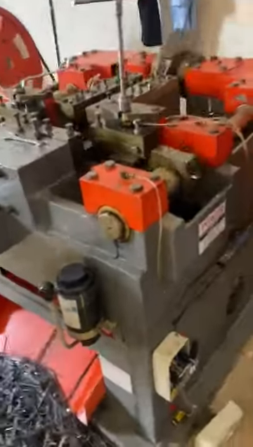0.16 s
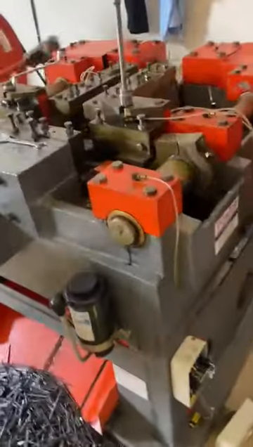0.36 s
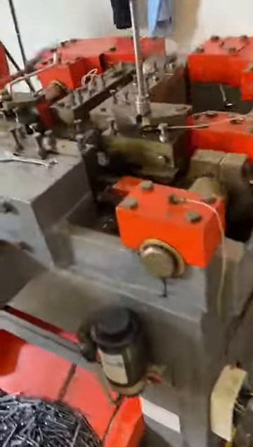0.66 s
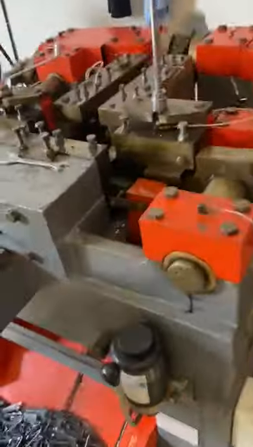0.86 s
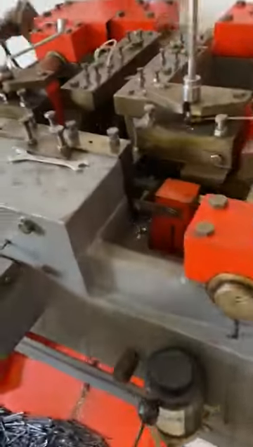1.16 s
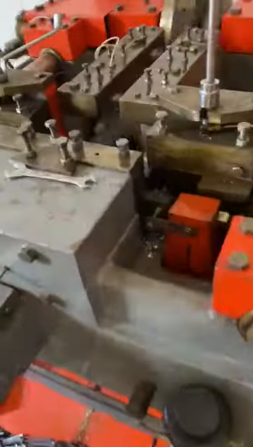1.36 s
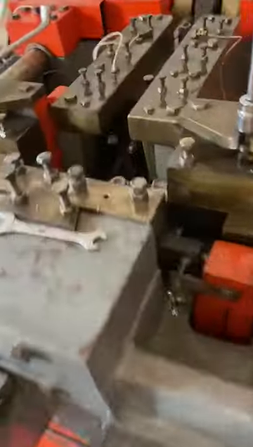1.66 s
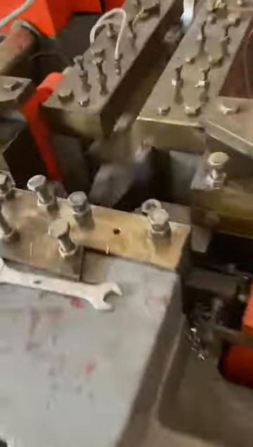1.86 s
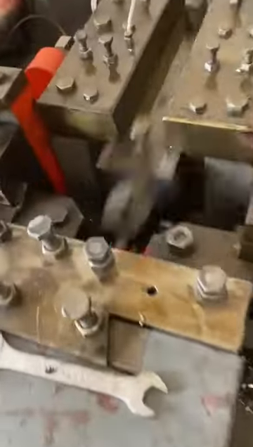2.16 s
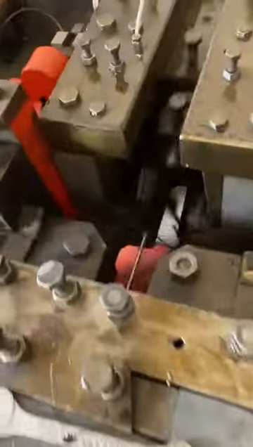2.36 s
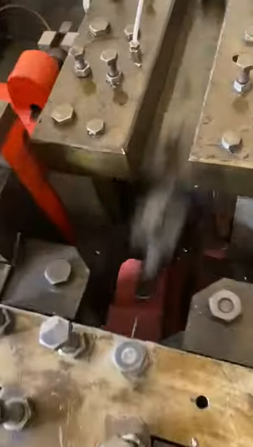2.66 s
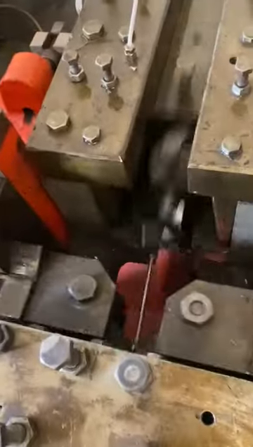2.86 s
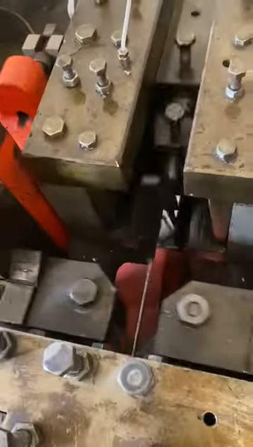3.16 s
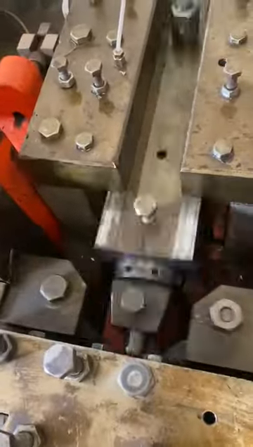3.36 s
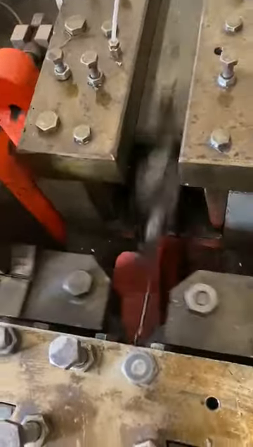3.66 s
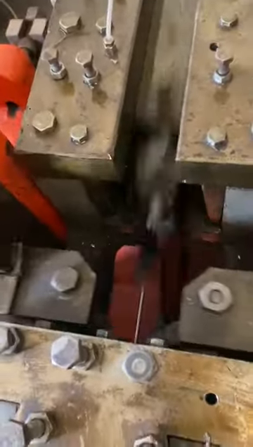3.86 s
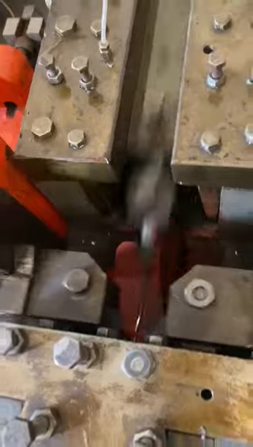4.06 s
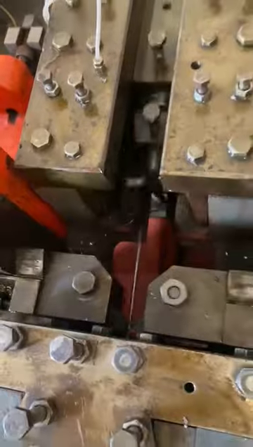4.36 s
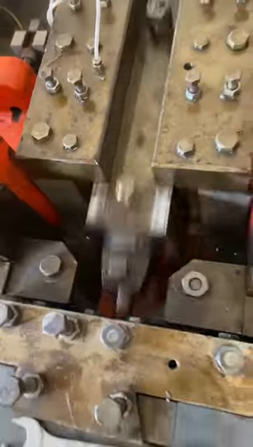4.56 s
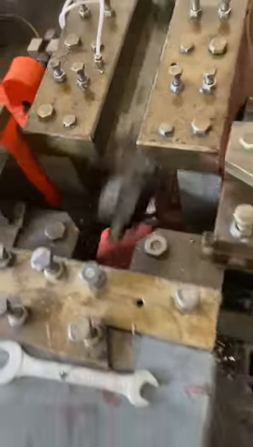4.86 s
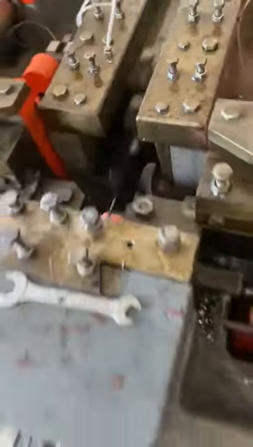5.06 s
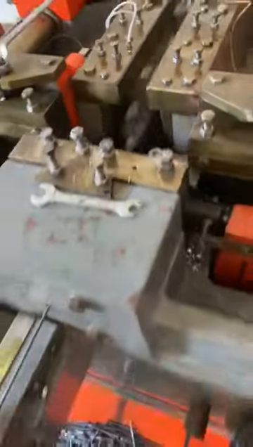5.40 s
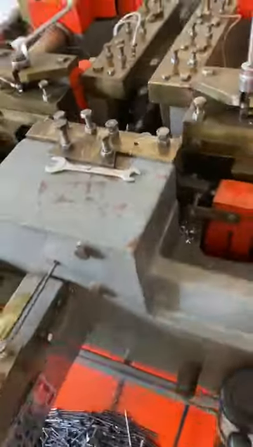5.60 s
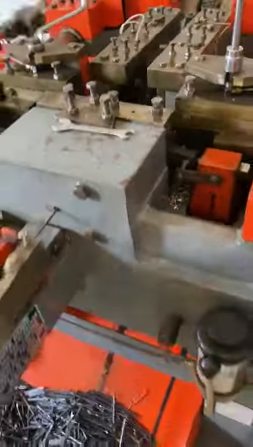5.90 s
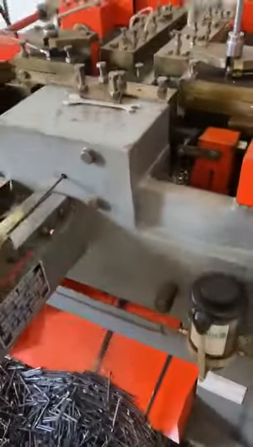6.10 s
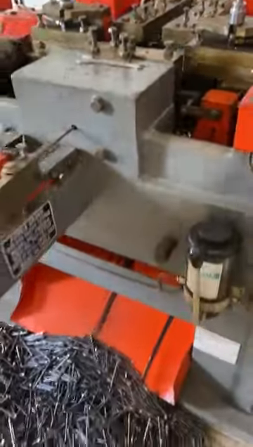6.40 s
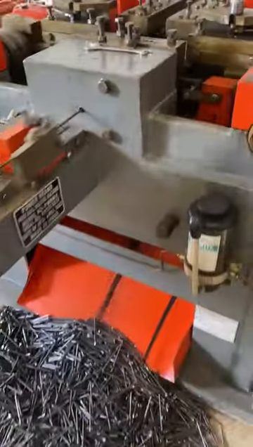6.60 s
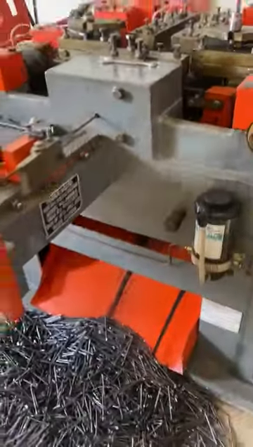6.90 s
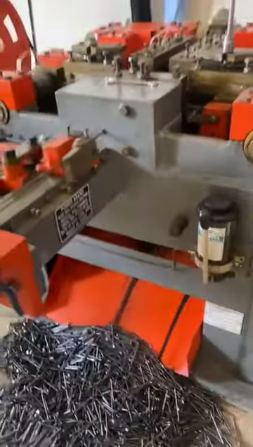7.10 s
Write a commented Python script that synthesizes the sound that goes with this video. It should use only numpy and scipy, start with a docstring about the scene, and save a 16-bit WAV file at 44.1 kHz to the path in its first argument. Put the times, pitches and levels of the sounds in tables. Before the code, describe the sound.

From 0 to 7.2 seconds a wire nail machine hammers without pause, one cycle about every 0.39 seconds. Each cycle begins with a bright cutter snap, then a gripper knock and a bass-heavy ram thud with slack rebounds; about 0.2 seconds after the snap the punch slams, dominant and short, ringing the cast frame, with a small high tick just after. Slams land near 0.3, 0.7, 1.1, 1.5 seconds and onward. Nails ping and finely jingle on a steel chute, with a prominent ping near 2.5. Air puffs fade at about 0.5, 0.8, 1.6 and 2.0, then more faintly from 4.7 onward. The sound is closest and brightest around 2 to 3 seconds; after 5.5 treble recedes, and from 6 cutters and slams weaken. A low motor drone with wavering hum sits beneath, with a faint, short workshop tail and wide stereo treble.

```python
"""A wire nail machine turns over about two and a half times a second, close to a moving stereo microphone.
Each turn the punch slams the head, the cutters snap, the grippers knock and the ram thuds home:
noise shaped in bands, with ringing modes of frame and chute. Nails ping and jingle as modes of the steel
chute, an air valve puffs fading noise, and the drone is patchy noise with two wavering low hum lines,
the upper near a mode of the cast frame. A workshop answers all but the drone with a faint diffuse tail."""
import sys
import numpy as np
from scipy import signal
from scipy.fft import rfft, irfft
from scipy.io import wavfile
from scipy.ndimage import uniform_filter1d

SR = 44100
rng = np.random.default_rng(int(sys.argv[2]) if len(sys.argv) > 2 else 0)


def persist_wave(psi):
    """Save psi, clipped to +-1, as 16-bit WAV."""
    counts = np.round(np.clip(psi, -1, 1) * 32767).astype(np.int16)
    wavfile.write(sys.argv[1], SR, np.atleast_2d(counts).T)


N = 319284  # length in samples

# Turns of the crank. Each row: punch time in seconds, punch level in dB, ram level in dB, cutter level in dB.
TURNS = [(-0.075, -21, -10, -23), (0.314, -1.5, -8, -22), (0.705, 0.5, -10, -27.5), (1.091, 1, -7, -32),
         (1.48, 3.5, -6, -19.5), (1.867, 2, -5.5, -20.5), (2.254, -1.5, -7, -18.5), (2.643, 0, -5, -20),
         (3.033, -1, -8.5, -20), (3.421, -1.5, -7.5, -22.5), (3.811, 0, -8, -21), (4.2, -0.5, -8, -21),
         (4.59, 1.5, -8, -19), (4.979, 2.5, -8.5, -25), (5.372, -1, -10.5, -22), (5.761, 0.5, -11, -24),
         (6.15, -2, -11, -34), (6.539, -4, -13, -35.5), (6.931, -7, -13.5, -31.5), (7.32, -7, -14.5, -31)]
# Ringing modes of the steel chute. Each row: frequency in Hz, relative level in dB, t60 in seconds.
CHUTE_MODES = [(2918, -8.5, 0.25), (3643, -4, 0.19), (3990, -9.5, 0.31), (4462, -4, 0.23), (5500, 0, 0.079),
               (6302, -2, 0.23), (7890, -16, 0.2), (8300, -10.5, 0.075), (10670, -28.5, 0.047),
               (11100, -31.5, 0.063)]
# How far the side resembles the mid; above 0 leans left. Each row: frequency in Hz, likeness from -1 to 1.
SIDE_LEAN = [(150, 0), (330, .5), (550, .64), (1000, .5), (1600, .2), (2300, -.15), (6000, 0)]
CUT_S = -0.2  # the cutters snap this long before the punch


def gain_of(db):
    """Decibels as an amplitude factor."""
    return 10 ** (np.asarray(db) / 20)


def evened(x):
    """Scale to an RMS of one."""
    return x / np.sqrt(np.mean(x ** 2) + 1e-20)


def read(points, hz, column=1):
    """Read a table on a log-frequency axis."""
    points = np.asarray(points, float)
    return np.interp(np.log(hz + 1), np.log(points[:, 0] + 1), points[:, column])


def over_time(points):
    """Gain curve over the whole scene from times in seconds and levels in dB."""
    s, db = np.transpose(points)
    return gain_of(np.interp(np.arange(N) / SR, s, db))


def add(mix, s, sound):
    """Lay a sound into the mix at s seconds, cutting what falls outside."""
    at = round(s * SR)
    sound = sound[:, max(-at, 0):]
    part = mix[:, max(at, 0):][:, :sound.shape[1]]
    part += sound[:, :part.shape[1]]


def near_db(s):
    """Nearness of the microphone, which drifts over the tools and away."""
    # Each row: time in seconds, nearness in dB.
    nearness = [(0, -3), (0.9, -3), (1.9, 0), (2.6, 2), (3.6, -2), (4.8, -2), (5.6, -5.5), (6.3, -12),
                (7.24, -5)]
    return np.interp(s, *np.transpose(nearness))


def side_likeness(hz):
    """Signed share of the mid signal in the side signal."""
    return np.clip(read(SIDE_LEAN, hz), -1, 1)


def rung(modes, t, spread_db, stray):
    """Every mode is a close pair with its own strength, phase and slight detuning, on both paths."""
    hz, db, t60 = np.transpose(modes + modes)[:, :, None, None]
    strength, phase, off = rng.standard_normal((3, len(hz), 2, 1))
    angle = 2 * np.pi * hz * (1 + stray * off) * t + 3 * phase
    decay = gain_of(db + spread_db * strength - 60 * t / t60)
    return (decay * np.sin(angle)).sum(0)


def blows(rows, tone, long, soft, alike, modes=(), modes_db=0, rebounds=(),
          rough_db=2.5, ripple_db=3, size=8192):
    """Dense vibration of struck steel: bass swells late and lasts, treble is at once; like blows sound alike.

    Each row: start in seconds, level in dB, bass tilt in dB, treble tilt in dB."""
    # How a blow swells and dies, before soft scales the rise and long the t60.
    # Each row: frequency in Hz, rise time constant in seconds, t60 in seconds.
    swell = [(100, 0.011, 0.19), (296, 0.0045, 0.15), (845, 0.0023, 0.066), (2610, 0.00065, 0.16),
             (8400, 0.0012, 0.058)]
    out, t, hz = np.zeros((2, N)), np.arange(size) / SR, np.fft.rfftfreq(size, 1 / SR)

    # overlapping bands that sum to one
    centres = np.geomspace(90, 11000, 8)
    bands = np.array([np.interp(np.log(hz + 1), np.log(centres), one) for one in np.eye(len(centres))])
    rise = read(swell, centres)[:, None] * soft
    t60 = read(swell, centres, column=2)[:, None] * long
    stroke = (1 - np.exp(-t / rise)) ** 2 * gain_of(-60 * t / t60)
    shape = stroke
    for late, db in rebounds:  # slack in the linkage strikes again
        shape = shape + gain_of(db) * np.roll(stroke, round(late * SR), 1) * (t > late)

    keep = np.clip(alike, 0, 1)
    noise, partials = rng.standard_normal((2, size)), rng.standard_normal(len(hz))
    for s, db, bass_db, treble_db in rows:
        # part of the previous blow's noise and partials carries on into this one
        noise = keep * noise + np.sqrt(1 - keep ** 2) * rng.standard_normal((2, size))
        partials = keep ** 2 * partials + np.sqrt(1 - keep ** 4) * rng.standard_normal(len(hz))
        looseness = evened(uniform_filter1d(rng.standard_normal(size), size=110))
        chatter = evened(gain_of(rough_db * looseness))  # loose parts
        ripple = evened(gain_of(ripple_db * evened(uniform_filter1d(partials, size=12))))  # short partials
        tilt_db = read([(250, bass_db), (900, 0), (4000, treble_db)], hz)
        colour = evened(gain_of(read(tone, hz))) * gain_of(tilt_db) * ripple
        banded = irfft(rfft(noise * chatter)[:, None] * colour * bands, size)
        body = (banded * shape).sum(1)
        add(out, s - .002, gain_of(db) * body)
        if modes:
            ring_t = t[:6000]
            fade = (1 - np.exp(-ring_t / 0.0074)) * np.cos(np.linspace(0, np.pi / 2, 6000))
            ringing = rung(modes, ring_t, spread_db=2.5, stray=0.0098) * fade
            add(out, s, gain_of(db + modes_db) * ringing)
    return out


def untilted(s, db):
    """Rows for blows() with neither bass nor treble tilt."""
    return [(at, level, 0, 0) for at, level in zip(s, db)]


def drone(wide_db=-5):
    """Motor, gears, belts and bearings as patchy noise with two wavering low hum lines, in mid and side."""
    # Level over time. Each row: time in seconds, level in dB.
    drone_levels = [(0, -26), (1, -28), (2, -26.5), (3, -29.5), (4, -29.5), (5, -29), (6, -30), (7.24, -30)]
    # Mid colour. Each row: frequency in Hz, relative level in dB per Hz.
    mid_tone = [(15, -55), (25, -21), (125, 7), (410, 13), (4450, -14.5), (4930, -84), (6390, -18),
                (7090, -63), (8500, -67), (12200, -101), (15900, -131), (22000, -120)]
    # Side colour. Each row: frequency in Hz, relative level in dB per Hz.
    side_tone = [(100, -85), (230, -30.5), (400, -12.5), (900, -12.5), (2500, -21), (5900, -37),
                 (8500, -31), (11000, -31), (12200, -56)]
    # Low hum lines, the upper near a mode of the cast frame.
    # Each row: centre frequency in Hz, RMS level in dB.
    hum_lines = [(135, -45), (162, -46)]
    frames, hz = N // 256 + 5, np.fft.rfftfreq(1024, 1 / SR)
    a, b, c, d, patches = rng.standard_normal((frames, 513, 5)).T
    patches = evened(uniform_filter1d(uniform_filter1d(patches, 8, 0), 10, 1))  # over frequency, then time
    lean, mid = side_likeness(hz)[:, None], a + 1j * b
    z = np.array([mid, lean * mid + np.sqrt(1 - lean ** 2) * (c + 1j * d)])
    tone_db = np.array([read(mid_tone, hz), read(side_tone, hz)])[:, :, None]
    z *= gain_of(tone_db + 1.8 * patches)
    mid, side = signal.istft(z, nperseg=1024, noverlap=768)[1][:, :N]
    level = over_time(drone_levels)
    mid, side = level * evened(mid), level * gain_of(wide_db) * evened(side)
    for line_hz, db in hum_lines:
        waver = evened(uniform_filter1d(uniform_filter1d(rng.standard_normal(N), 3000), 3000))
        phase = 2 * np.pi * np.cumsum(line_hz + 1.25 * waver) / SR
        mid += np.sqrt(2) * gain_of(db) * np.sin(phase)
    return mid, side


def punch():
    """The punch slams the nail head and rings the cast frame; bass stays level, treble follows nearness."""
    # Each row: frequency in Hz, relative level in dB per Hz.
    punch_tone = [(35, -25), (60, -3), (464, 10), (905, -3.5), (1160, -7), (1510, -8.5), (2750, -23),
                  (5250, -30), (10900, -48), (12200, -111), (15900, -93), (22000, -120)]
    # Modes of the cast frame. Each row: frequency in Hz, relative level in dB, t60 in seconds.
    frame_modes = [(163, -18.5, 0.61), (250, -22.5, 0.26), (332.2, -22, 0.22), (384, -32, 0.17),
                   (479.3, -16, 0.041), (877, -11, 0.18), (1430, -64, 0.15)]
    bass_level_db, treble_level_db, treble_per_near = -10, 6, 0.79
    s, punch_db = np.transpose(TURNS)[:2]
    treble_db = treble_level_db + treble_per_near * near_db(s)
    heads = zip(s, punch_db, bass_level_db - punch_db, treble_db - punch_db)
    return blows(heads, punch_tone, long=1.0, soft=0.94, alike=0.895, modes=frame_modes, modes_db=-12.5,
                 rebounds=[(.028, -17), (.05, -21), (.095, -29)])  # (seconds late, dB)


def ticks():
    """A small bright tick after each punch, its level following the nearness of the microphone."""
    # Each row: frequency in Hz, relative level in dB per Hz.
    tick_tone = [(1500, -53), (4000, 30), (6500, 58), (12000, -70)]
    tick_s, tick_db = 0.061, -33.5  # after the punch; level at zero nearness
    s = np.transpose(TURNS)[0]
    return blows(untilted(s + tick_s, tick_db + near_db(s)), tick_tone, long=1.0, soft=0.9, alike=0.61)


def nails(per_s=500, spread_db=4):
    """Cut nails ping on the chute; a fine random jingle follows each cut, each touch ringing one mode."""
    # Jingle before its decay after each cut. Each row: time in seconds, level in dB.
    jingle_levels = [(0, -49), (1.2, -46.5), (2.4, -48), (3.6, -48.5), (4.8, -46), (6, -51), (7.24, -46.5)]
    # Nails that bounce again. Each row: start in seconds, nominal peak in dB at the strongest mode.
    bounces = [(0.5681, -34.5), (0.768, -37), (0.857, -35), (1.032, -40), (1.3518, -35), (1.7449, -31.5),
               (2.2104, -38.5), (2.5174, -27.5), (3.3635, -37), (4.142, -34), (4.859, -37), (6.336, -41),
               (6.717, -39)]
    ping_s = -0.197  # against the punch
    ping_db, ping_spread_db = -9.5, 3  # against the cutters
    out, t = np.zeros((2, N)), np.arange(N) / SR
    punch_s, cut_db = np.transpose(TURNS)[[0, 3]]

    dropped = ping_db + cut_db + ping_spread_db * rng.standard_normal(len(punch_s))
    ping_t = t[:7000]
    onset = 1 - np.exp(-ping_t / 0.0014)
    for s, db in list(zip(punch_s + ping_s, dropped)) + bounces:
        add(out, s, gain_of(db) * rung(CHUTE_MODES, ping_t, spread_db=2.5, stray=0.0062) * onset)

    cuts = punch_s + CUT_S
    since = t - cuts[np.maximum(np.searchsorted(cuts, t) - 1, 0)]
    strength = gain_of(spread_db * np.minimum(rng.exponential(1, (2, N)), 4))
    touches = strength * (rng.random((2, N)) < per_s / SR) * rng.choice([-1., 1.], (2, N))
    touches *= over_time(jingle_levels) * gain_of(-20. * since)  # dies at 20 dB per second after a cut
    which = rng.integers(0, len(CHUTE_MODES), (2, N))
    for k, (hz, db, t60) in enumerate(CHUTE_MODES):
        # a two-pole resonator rings at the mode
        pole = gain_of(-60 / SR / t60) * np.exp(2j * np.pi * hz / SR)
        near_mode = signal.butter(1, [hz * .9, hz * 1.1], "band", fs=SR)
        touch = signal.lfilter(*near_mode, touches * (which == k))
        out += gain_of(db) * signal.lfilter([pole.imag], [1, -2 * pole.real, abs(pole) ** 2], touch)
    return out


def cutters():
    """The cutters snap through the wire and ring the chute."""
    # Each row: frequency in Hz, relative level in dB per Hz.
    cutter_tone = [(300, 1), (1500, 12), (3000, 3), (6300, 4.5), (7500, -14), (12000, -28)]
    s, cut_db = np.transpose(TURNS)[[0, 3]]
    return blows(untilted(s + CUT_S, cut_db), cutter_tone, long=1.31, soft=0.96, alike=0.64,
                 modes=CHUTE_MODES, modes_db=-13, rebounds=[(.008, -14), (.045, -7.5), (.07, -19.5)])


def grippers():
    """The grippers knock, a short blow strongest in the low mids."""
    # Each row: frequency in Hz, relative level in dB per Hz.
    gripper_tone = [(35, -40), (60, -7), (430, 15.5), (2000, 3.5), (6300, -30), (9000, -89), (12000, -80)]
    grip_s, grip_db = -0.184, -2.5  # against the punch; against the ram
    s, ram_db = np.transpose(TURNS)[[0, 2]]
    return blows(untilted(s + grip_s, ram_db + grip_db), gripper_tone, long=0.86, soft=1.0, alike=0.8)


def ram():
    """The ram thuds home, striking twice more through slack in the linkage."""
    # Each row: frequency in Hz, relative level in dB per Hz.
    ram_tone = [(35, -54), (60, -12.5), (370, 7), (1300, -5.5), (4400, -27.5), (8500, -135), (12000, -119)]
    ram_s = -0.159  # against the punch
    s, ram_db = np.transpose(TURNS)[[0, 2]]
    return blows(untilted(s + ram_s, ram_db), ram_tone, long=1.0, soft=1.0, alike=0.907,
                 rebounds=[(.034, -12.5), (.065, -18.5)])


def puffs():
    """Escaping air: smooth bright noise that opens quickly and fades."""
    # Each row: start in seconds, level in dB before the envelope.
    puff_starts = [(0.459, -24.5), (.80, -22.5), (1.593, -22), (1.973, -28.5), (4.695, -27.5), (5.43, -29),
                   (5.98, -29.5), (6.274, -27.5), (6.72, -34.5), (7.15, -29.5)]
    # Each row: frequency in Hz, relative level in dB per Hz.
    puff_tone = [(500, 26), (1800, 27), (4400, 22.5), (7600, 5.5), (12000, -34)]
    t60_s = 0.38
    flow, t = np.zeros((1, N)), np.arange(SR // 2)[None] / SR
    for s, db in puff_starts:
        add(flow, s, gain_of(db - 60 * t / t60_s) * (1 - np.exp(-t / 0.0065)))
    colour = gain_of(read(puff_tone, np.fft.rfftfreq(N, 1 / SR)))
    air = irfft(rfft(rng.standard_normal((2, N))) * colour, N)
    return flow * evened(air)


def shop(x):
    """Walls answer with a diffuse tail, each band dying at its own speed."""
    # Each row: frequency in Hz, t60 in seconds.
    tail_times = [(150, 0.17), (1000, 0.28), (4000, 0.1), (10000, 0.04)]
    hz, t, z = signal.stft(rng.standard_normal((2, SR)), SR, nperseg=256)
    tail = signal.istft(z * gain_of(-60 * t / read(tail_times, hz)[:, None]), SR, nperseg=256)[1]
    tail = np.pad(tail / np.linalg.norm(tail[0]), ((0, 0), (400, 0)))  # 400 samples of delay
    return signal.fftconvolve(x, tail, axes=1)[:, :N]


def scene():
    """Two unrelated paths of the same scene become the mid and side pick-up of a stereo microphone."""
    # Each row: frequency in Hz, side level over mid in dB.
    side_levels = [(60, -37), (130, -61), (220, -40), (430, -5.5), (840, 2), (3100, -1.5), (5000, 2),
                   (7500, 9.5), (9500, 28.5), (12000, 24.5)]
    machine = punch() + ticks() + cutters() + grippers() + ram()
    near = machine + nails() + puffs()
    first, second = rfft(near + gain_of(-20.5) * shop(near))
    hz = np.fft.rfftfreq(N, 1 / SR)
    lean = side_likeness(hz)
    side = gain_of(read(side_levels, hz)) * (lean * first + np.sqrt(1 - lean ** 2) * second)
    mid, side = irfft(np.array([first, side]), N) + drone()
    return np.array([mid + side, mid - side])


def record(dry):
    """The loudest peaks round off just under full scale; then a lowpass limits the band."""
    edge_hz = 11900
    rounded = dry / (1 + abs(dry / .92) ** 6) ** (1 / 6)
    lowpass = signal.firwin(255, edge_hz, window=("kaiser", 9), fs=SR)
    return signal.oaconvolve(rounded, lowpass[None], "same")


dry = scene()
out = record(dry)
persist_wave(out)
```